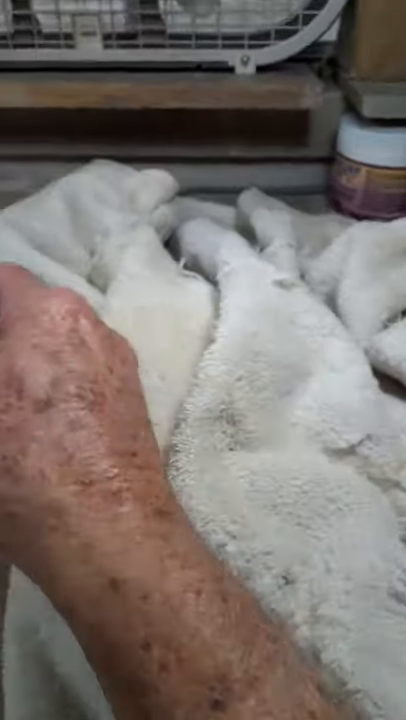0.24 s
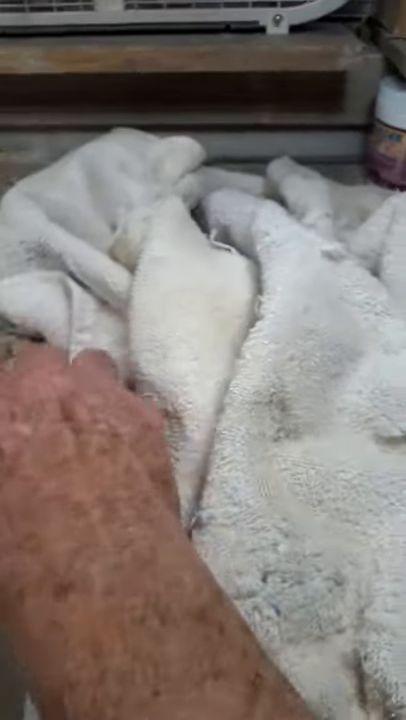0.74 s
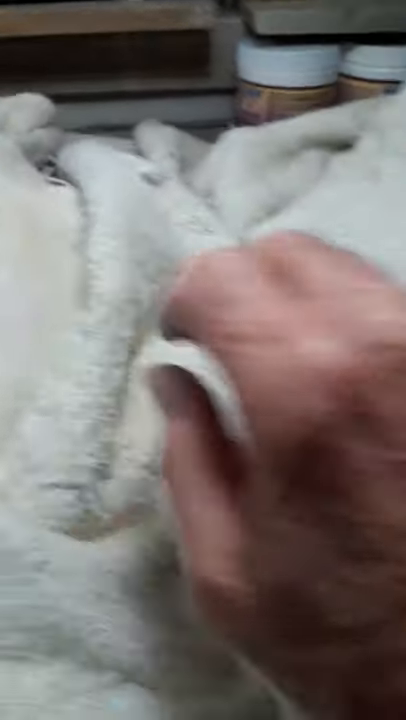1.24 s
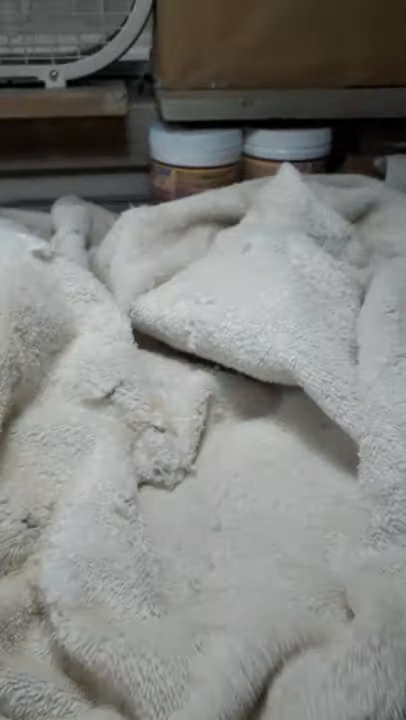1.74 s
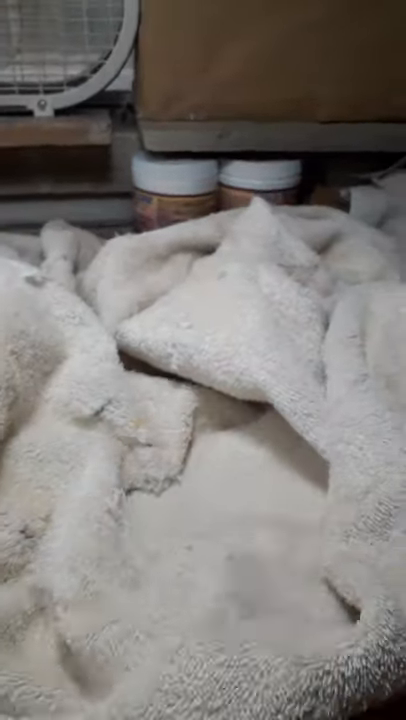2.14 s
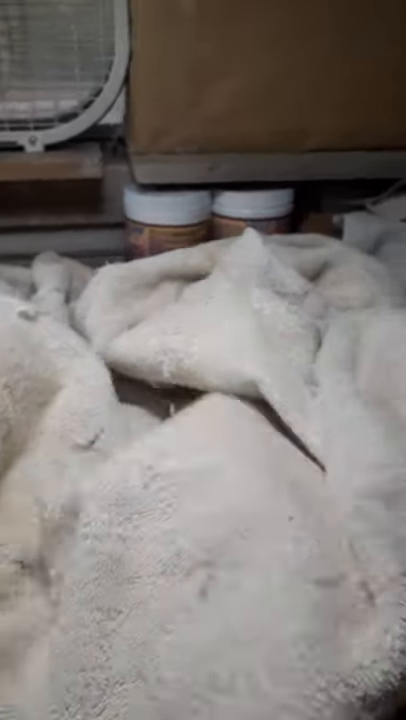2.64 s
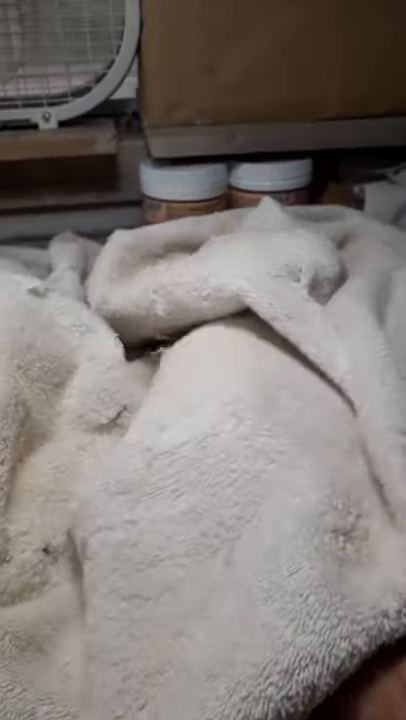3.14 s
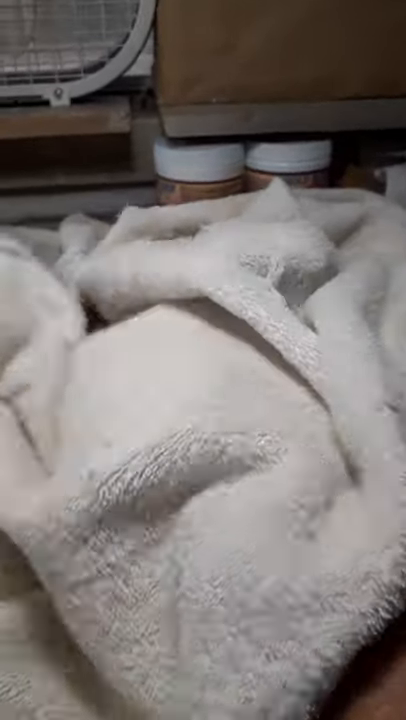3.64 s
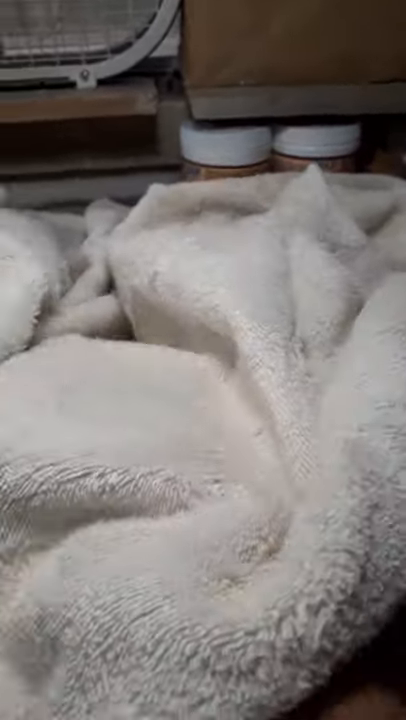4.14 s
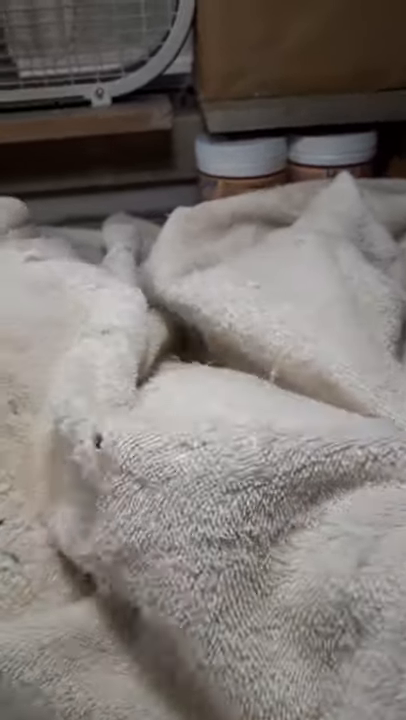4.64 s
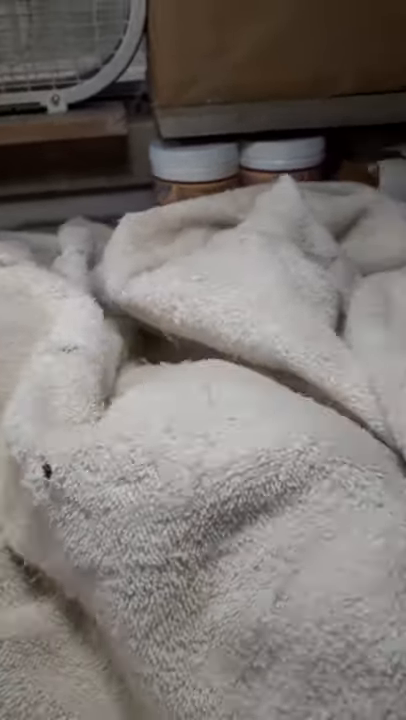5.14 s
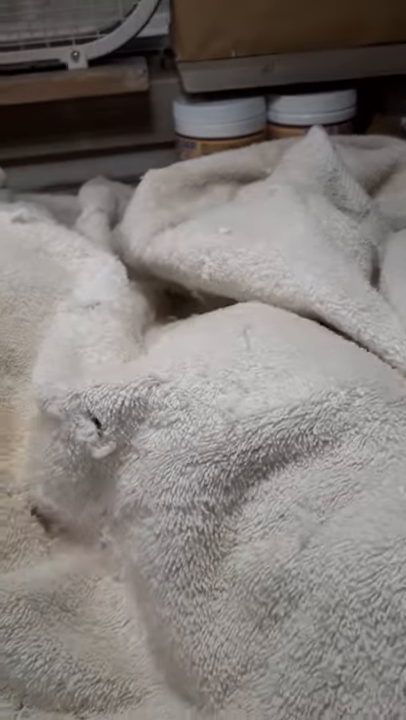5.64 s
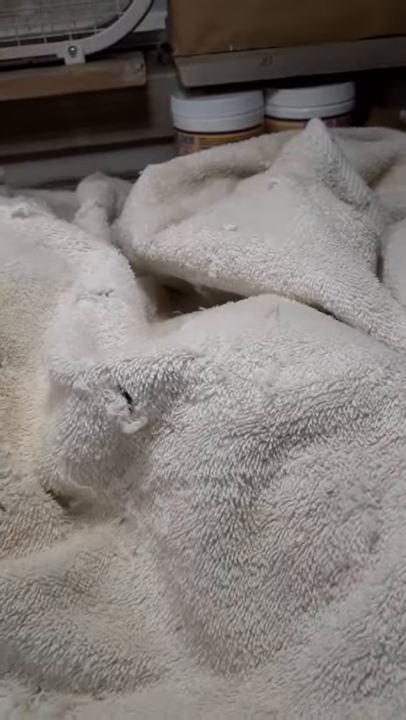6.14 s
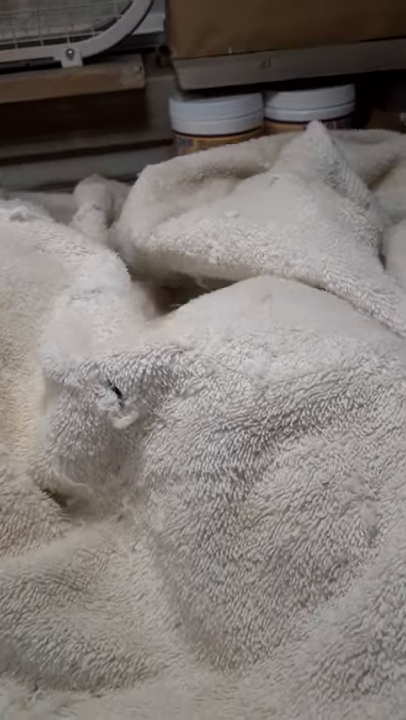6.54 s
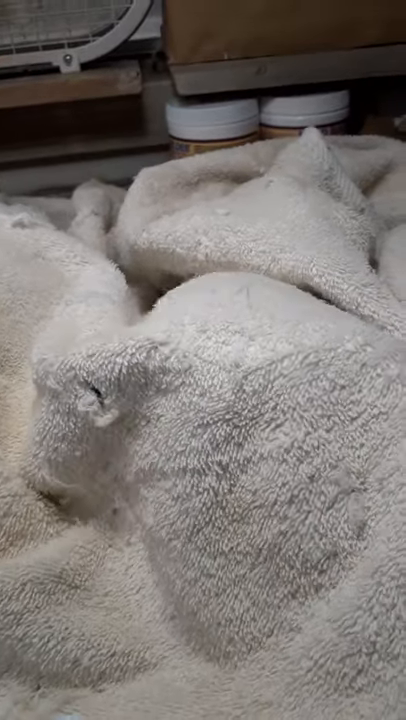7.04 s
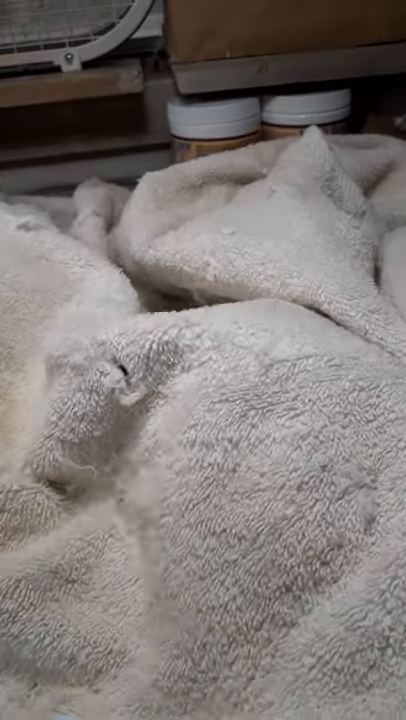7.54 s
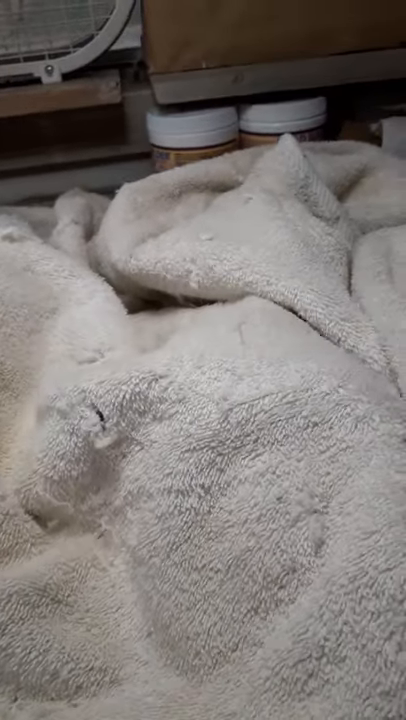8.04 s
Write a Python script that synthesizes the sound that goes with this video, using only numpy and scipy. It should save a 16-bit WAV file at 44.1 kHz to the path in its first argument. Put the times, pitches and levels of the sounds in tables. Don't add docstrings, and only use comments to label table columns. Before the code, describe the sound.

Close, dry stone clicks and gritty rubs, soft table thumps and cloth rustle, with the loudest knock muffled under a towel midway.

```python
import sys
import numpy as np
from scipy import signal
from scipy.fft import rfft, irfft
from scipy.io import wavfile

SR = 44100
rng = np.random.default_rng(int(sys.argv[2]) if len(sys.argv) > 2 else 0)


def persist_wave(psi):
    counts = np.round(np.clip(psi, -1, 1) * 32767).astype(np.int16)
    wavfile.write(sys.argv[1], SR, np.atleast_2d(counts).T)


def volts_from_decibels(level):
    exponent = np.asarray(level, float) / 20
    return 10 ** exponent


N = 366030

PORT_LAG_S_PER_DB = .00002
SIDES = np.array([[1], [-1]])


def rms_one(x):
    return x / np.sqrt(np.mean(x ** 2) + 1e-20)


def in_time(rows):
    return np.interp(np.arange(N) / SR, *np.transpose(rows))


def drift(rate_hz):
    knots = rng.standard_normal(4000)
    return np.interp(np.arange(N) / SR * rate_hz, np.arange(4000), knots) * np.sqrt(1.5)


def colour(x, spectrum):
    size = 2048
    hz, db = np.transpose(spectrum)
    bins_hz = np.arange(1, size // 2 + 2) * SR / size
    log_gain = np.log(volts_from_decibels(np.interp(np.log(bins_hz), np.log(hz), db)))
    cepstrum = irfft(log_gain)
    cepstrum[1:size // 2] *= 2
    cepstrum[size // 2 + 1:] = 0
    impulse = irfft(np.exp(rfft(cepstrum)))
    return signal.oaconvolve(x, np.atleast_2d(impulse), axes=-1)[:, :N]


def ring(hz, t60_s):
    t = np.arange(int(t60_s * SR) + 8) / SR
    return np.sin(2 * np.pi * hz * t) * volts_from_decibels(-60 * t / t60_s)


def resonate(x, hz, width_hz):
    r = np.exp(-np.pi * width_hz / SR)
    poles = [1, -2 * r * np.cos(2 * np.pi * hz / SR), r * r]
    return np.sqrt((1 - r * r) / 2) * signal.lfilter([1, 0, -1], poles, x)


def muffle(x, cut_hz):
    return signal.sosfilt(signal.butter(2, min(cut_hz, 16000), fs=SR, output="sos"), x)


def grains(per_s, spread_db):
    sizes = volts_from_decibels(spread_db * np.minimum(rng.exponential(1, N), 4))
    sizes = sizes * rng.choice([-1, 1], N)
    return rms_one(sizes * (rng.random(N) < per_s / SR))


def add(out, at_s, sound, pan_db):
    for side, sign in enumerate([1, -1]):
        start = int((at_s - sign * pan_db * PORT_LAG_S_PER_DB / 2) * SR)
        part = out[side, max(start, 0):][:len(sound)]
        part += volts_from_decibels(sign * pan_db / 2) * sound[:len(part)]


def pair(x, pan_db, alike):
    time, alike = np.arange(N), np.clip(alike, 0, 1)
    lag = pan_db * PORT_LAG_S_PER_DB * SR / 2
    left = np.interp(time + lag, time, x[0])
    right = np.interp(time - lag, time, x[0])
    return np.sqrt(alike) * np.array([left, right]) + np.sqrt(1 - alike) * x[1:]


def joined(*levels_db):
    return 10 * np.log10(sum(volts_from_decibels(db) ** 2 for db in levels_db))


def efforts(s, hold_s, db, rise_db_s, release):
    fall_db_s, tail_db, tail_db_s = release
    t = np.arange(0, N + 64, 64)[:, None] / SR
    after = np.maximum(t - s - np.abs(hold_s), 0)
    rise = volts_from_decibels(db - rise_db_s * np.maximum(s - t, 0))
    fall = np.maximum(volts_from_decibels(-fall_db_s * after), volts_from_decibels(tail_db - tail_db_s * after))
    level_db = 10 * np.log10(np.sum((rise * fall) ** 2, axis=1) + 1e-14)
    return np.interp(np.arange(N) / SR, t[:, 0], level_db)


# start_s [s], level_db [peak dB], pitch_hz [Hz], pan_db [left-right dB]
OPEN_CLACKS = [(0.5826, -18, 4500, 3), (0.6152, -17, 4700, -1), (0.6401, -12.5, 4700, 5),
               (0.652, -27.5, 4200.0, -8), (0.6591, -23, 2350, 13.5), (0.9982, -27, 4750, 6.5),
               (1.048, -34, 2820, 10), (1.1135, -26, 2820, 2.5), (1.1326, -35, 2765, 15),
               (1.578, -59, 1790, -5), (2.145, -36, 4350, -8.5), (2.845, -44.5, 4600, -8.5),
               (3.6143, -20, 2400, -2), (3.6264, -25.5, 2310, 4.5), (3.6344, -26.5, 2330.0, -3.5),
               (3.6991, -35, 1680, 6), (3.753, -40.5, 2520, 8), (3.9012, -36.5, 1260, -13),
               (3.9865, -20.5, 2480, 4), (4.2474, -29.5, 2130, -6.5), (4.29, -26.5, 2100, -6),
               (4.3464, -21.5, 1900, 4.5), (4.357, -28.5, 1490, -1), (4.399, -28, 1430, -4),
               (4.434, -31, 1300, -9)]
# start_s [s], level_db [peak dB], pitch_hz [Hz], pan_db [dB]
DEEP_CLACKS = [(4.6594, -37, 1870, -16), (4.7297, -32, 2050, -27.5), (4.741, -21.5, 2160, -3.5),
               (4.77, -21, 4200, -2.5), (4.7764, -9.5, 2160, -12.5), (4.7808, -17.5, 2240, -7.5),
               (4.788, -23, 2330, -11), (4.798, -23, 2320, -10), (4.8576, -20.5, 2070, -4.5),
               (5.011, -22, 2300, -12), (5.1207, -29.5, 1260, -5), (5.185, -38.5, 1470, -7),
               (5.7582, -36.5, 2180, -17), (5.815, -31.5, 2640, -6), (5.8525, -31.5, 3800, -1.5),
               (6.1432, -16, 3300, 5), (6.208, -26, 2570, -5), (6.984, -24, 2540, -11),
               (7.1405, -30, 2570, -5), (7.1595, -40.5, 2720, 18), (7.1772, -36.5, 2100, -3),
               (7.2959, -36.5, 2010, -0.5), (7.431, -35.5, 2780, 0), (7.5202, -37.5, 2060, -7),
               (7.559, -36, 2100, -6.5), (7.6031, -17.5, 2840, -2), (7.6565, -22, 2760, -5),
               (7.7773, -30.5, 2040, -6.5), (7.869, -23, 2450, -11), (7.912, -27, 2840, -4)]


def clacks(out):
    events = OPEN_CLACKS + DEEP_CLACKS
    chance = rng.standard_normal((len(events), 600))
    for (start_s, level_db, pitch_hz, pan_db), noise in zip(events, chance):
        knock = ring(pitch_hz, 2.6 / pitch_hz + 0.00092)
        overtone = ring(pitch_hz * (1.8 + .1 * noise[1]), .002) * volts_from_decibels(2 * noise[0])
        knock[:len(overtone)] += volts_from_decibels(-19) * overtone[:len(knock)]
        cycles = np.arange(len(knock)) * pitch_hz / SR
        knock *= 1 - np.exp(-(cycles / 0.16) ** 2)
        chatter = noise ** 3 * volts_from_decibels(-33 - 60 * np.arange(600) / SR / 0.025)
        chatter[0] = 1
        sound = muffle(np.convolve(chatter, knock), 2.4 * pitch_hz)
        add(out, start_s - .0002, -volts_from_decibels(level_db + 6.5) * sound, pan_db)


# start_s [s], level_db [peak dB],
# pitch_hz [Hz], pan_db [left-right dB]
LIGHT_TOUCHES = [(0.599, -30, 2120, 2), (0.6764, -34, 1670, 3), (.7585, -31, 1900, 3),
                 (.7635, -32, 1600, 3), (.788, -34, 2200, 3), (1.1214, -33, 2600, 5),
                 (1.1434, -34, 2600, -1), (4.068, -36, 3600, 1), (4.209, -38, 2020, -2),
                 (4.584, -49.5, 5300, -3.5), (4.8132, -22.5, 2080, -3), (5.682, -61, 3000, -11),
                 (5.8357, -40.5, 3200, -6.5), (5.8521, -34.5, 2520, 1), (6.0526, -43.5, 1460, -2),
                 (6.0944, -42, 9000, 0), (6.1174, -37, 2000, -1.5), (6.1978, -32, 2200, -2),
                 (6.969, -52.5, 2980, -5.5), (4.4265, -37, 1500, -3), (7.0745, -41, 2300, -1),
                 (6.58, -42, 2600, -3), (4.3265, -36, 1700, 0), (7.1898, -32, 1640, 0),
                 (7.1974, -43, 2100, -3), (4.6295, -45, 1800, -7), (7.2274, -56, 4400, -3),
                 (7.2364, -51, 1900, 0), (4.2605, -36, 2500, -5), (7.314, -47, 3900, -3),
                 (7.3318, -46, 8500, 1), (7.5435, -43, 9000, 0), (7.5655, -38, 9000, -4),
                 (7.5788, -36, 8000, -4), (7.6658, -24, 2760, -12), (7.6764, -31, 4300, -12),
                 (7.71, -31, 2310, -6.5), (7.718, -36, 2350, -5), (7.7478, -27, 2300, -6),
                 (7.783, -31, 2080, -6), (7.8814, -35, 2450, -7.5), (7.9483, -29, 2430, 1),
                 (7.9607, -33, 4500, -4), (6.628, -48, 2500, -3), (5.29, -56, 4500, -5.5)]


def ticks(out):
    for start_s, level_db, pitch_hz, pan_db in LIGHT_TOUCHES:
        knock = ring(pitch_hz, 3.3 / pitch_hz + 0.00056)
        cycles = np.arange(len(knock)) * pitch_hz / SR
        knock *= 1 - np.exp(-(cycles / 0.24) ** 2)
        add(out, start_s, -volts_from_decibels(level_db + 3.5) * muffle(knock, 3.9 * pitch_hz), pan_db)


# [favoured by the spot struck, Hz]
FREE_SLAB_HITS = [(0.5815, -24, 12000), (0.615, -25.5, 12300), (0.64, -26, 11580), (0.661, -42, 8990),
                  (0.759, -41, 11800), (0.0, -56, 11900), (0.84, -61, 12000), (0.88, -61, 11600),
                  (0.92, -60, 11700), (0.957, -62, 11500), (1.078, -47, 11600), (1.14, -52, 11500),
                  (0.997, -48, 11700), (1.048, -44, 11550), (1.112, -45, 11640)]
# [time to fall 60 dB, s]
FREE_SLAB_MODES = [(8990, 0.24), (11430, 0.16), (12150, 0.087), (12300, 0.13), (13480, 0.06)]
# [favoured, Hz]
DAMPED_SLAB_HITS = [(3.6144, -35.5, 11730), (3.9855, -19.5, 10790), (4.056, -37.5, 10890),
                    (4.2477, -26, 13100), (4.2905, -36, 14100), (4.3377, -40, 10870), (4.776, -30.5, 12050),
                    (5.005, -46, 11730), (5.757, -55, 11450), (5.8524, -73.5, 11300), (6.0745, -52, 11700),
                    (6.12, -46, 11800), (6.141, -28.5, 11490), (6.9828, -33.5, 11920),
                    (7.1413, -40.5, 11860), (7.295, -50, 11700), (7.5213, -56, 11500), (7.6014, -29, 11870),
                    (7.6565, -37, 11500), (7.716, -52, 12100), (7.7485, -42, 11070), (7.779, -44, 11070)]
# [time to fall 60 dB, s]
DAMPED_SLAB_MODES = [(11070, 0.054), (11440, 0.061), (12160, 0.058), (14120, .06), (15400, .04)]


def slab(out, hits, modes, split_hz, pan_db, rise_s):
    shade_db_per_octave, deepest_shade_db = 164.5, -32.5
    contact_loss_db = -6
    hits = sorted(hits)
    next_hits = hits[1:] + [(N / SR,)]
    for (start_s, level_db, favoured_hz), (next_s, *_) in zip(hits, next_hits):
        for pitch_hz, t60_s in modes:
            octaves_off = abs(np.log2(pitch_hz / favoured_hz))
            mode_db = max(-shade_db_per_octave * octaves_off, deepest_shade_db)
            beating = .3 * ring(pitch_hz + split_hz, 1.6 * t60_s)
            strong = ring(pitch_hz, t60_s)
            beating[:len(strong)] += strong
            t = np.arange(len(beating)) / SR
            beating *= 1 - np.exp(-t / rise_s)
            beating *= volts_from_decibels(contact_loss_db * np.clip((t + start_s - next_s) / .003 + 1, 0, 1))
            add(out, start_s, volts_from_decibels(level_db + mode_db + 5.5) * beating, pan_db)


# start_s [s], length_s [s], level_db
# [dB], pitch_hz [Hz], width_hz [Hz]
SINGING_SCRAPES = [(0.738, 0.066, -43.5, 1640, 700), (2.844, 0.1, -52, 260, 117),
                   (3.68, 0.021, -53, 1840, 700), (3.899, 0.037, -57.5, 1160, 690),
                   (3.999, 0.16, -49, 433, 294), (4.786, 0.03, -29.5, 2180, 790),
                   (4.987, 0.047, -34.5, 2330, 696), (4.986, 0.051, -38.5, 1240, 400),
                   (5.025, 0.1, -57, 2700, 200), (5.11, 0.019, -48.5, 1380, 786),
                   (5.179, 0.021, -53, 1360, 795), (5.715, 0.024, -58.5, 2200, 900),
                   (5.851, 0.029, -45, 855, 495), (6.054, 0.042, -48.5, 1440, 790),
                   (6.115, 0.022, -47.5, 1880, 700), (6.139, .045, -38, 2670, 600),
                   (6.139, 0.028, -35.5, 3700, 905), (6.204, 0.026, -44.5, 1080, 600),
                   (6.948, 0.13, -64, 1300, 725), (7.137, 0.042, -60, 3780, 595),
                   (4.364, .012, -48, 11000, 6000), (7.43, 0.015, -55, 1500, 1200),
                   (7.519, 0.03, -53, 1670, 300), (7.587, 0.028, -40, 1260, 400),
                   (7.615, 0.048, -41, 990, 300), (7.66, 0.035, -42, 586, 400),
                   (7.666, 0.087, -49, 2220, 900), (3.987, .03, -47, 3600, 3000),
                   (7.936, 0.04, -46.5, 2520, 700), (.86, 0.14, -62, 890, 600),
                   (6.52, 0.11, -64.5, 2500, 1500), (5.8, .04, -47, 990, 400),
                   (6.981, 0.01, -38.5, 2480, 400), (0.611, .012, -38, 7860, 1200),
                   (7.001, 0.063, -63, 3900, 1200), (5.753, 0.02, -47, 695, 500),
                   (1.001, .025, -48, 4600, 1200)]


def scrapes(pan_db):
    size = SR // 3
    out = np.zeros((2, N))
    chance = rng.standard_normal((len(SINGING_SCRAPES), 3, size))
    for (start_s, length_s, level_db, pitch_hz, width_hz), noise in zip(SINGING_SCRAPES, chance):
        phase = np.arange(size) / SR / length_s
        stroke = np.sin(np.pi * np.minimum(phase, 1) ** 0.82)
        tail = volts_from_decibels(-18.5 - 6.4 * phase) * np.minimum(3 * phase, 1)
        push = np.maximum(stroke, tail)
        slips = (noise[0] + .35 * noise[1:]) * np.abs(noise[0]) ** 1.4
        singing = resonate(resonate(slips, pitch_hz, width_hz), pitch_hz, 2 * width_hz)
        sound = volts_from_decibels(level_db) * push * rms_one(muffle(singing, 1.4 * pitch_hz))
        start = int(start_s * SR)
        placed = volts_from_decibels(pan_db[start] / 2 * SIDES) * sound
        out[:, start:start + size] += placed[:, :N - start]
    return out


# start_s [s], hold_s [s], rub_db [dB], towel_db [dB]
HAND_JERKS = [
    (0.582, 0.016, -45.5, -48),
    (0.613, 0.02, -34, -48),
    (1.011, 0.149, -64, -65),
    (1.579, 0.008, -62.5, -64),
    (2.852, .005, -76, -56.5),
    (3.986, .11, -50, -60.5),
    (4.758, 0.057, -39, -61.5),
    (4.986, 0.036, -44, -59.5),
    (5.497, 0.016, -62, -95.5),
]


def sudden(column, under_db, release):
    rise_db_s = 5000
    start_s, level_db = np.transpose(OPEN_CLACKS + DEEP_CLACKS)[:2]
    jerks = np.transpose(HAND_JERKS)
    from_clacks = efforts(start_s, 0.00059, level_db + under_db, rise_db_s, release)
    from_jerks = efforts(*jerks[:2], jerks[column], rise_db_s, release)
    return joined(from_clacks, from_jerks)


# start_s [s], hold_s [s], level_db [dB]
FACE_RUBS = [(0.0, 0.0042, -49.5), (0.763, 0.014, -42), (0.915, 0.073, -65), (1.04, 0.065, -56.5),
             (1.725, .02, -71), (1.951, 0.0039, -39), (2.106, 0.16, -64.5), (2.57, 0.0058, -57),
             (2.877, 0.47, -74.5), (3.442, 0.32, -74), (3.787, .005, -55.5), (4.25, 0.0056, -40.5),
             (4.304, 0.23, -49), (4.473, .25, -56.5), (5.21, 0.0053, -69), (5.3, 0.022, -67.5),
             (5.547, .03, -58.5), (5.726, 0.045, -54), (5.862, 0.0062, -48.5), (6.073, 0.0083, -53),
             (6.135, 0.079, -46), (6.577, 0.0046, -50.5), (6.68, 0.05, -68), (7.207, 0.087, -64.5),
             (7.601, 0.03, -39), (7.748, .05, -48), (7.947, 0.0037, -39.5), (8.172, 0.0038, -55)]
# pitch_hz [Hz], width_hz [Hz], level_db [dB]
STONE_MODES = [(905, 560, -0.5), (1425, 130, -1.5), (1610, 340, -5.5), (2450, 270, -0.5), (2707, 350, -4.5),
               (3830, 300, -3.5), (4600, 680, -4.5), (8600, 880, -26.5)]
# time_s [s], change_db [dB]
TOWEL_COVER = [
    (0.0, 1),
    (4.3, -2),
    (4.8, -7.5),
    (6.0, -5.5),
    (6.3, -2.5),
    (8.3, -3.5),
]


def grinding(pan_db):
    release = (880, -16.5, 120)
    rubbing_db = efforts(*np.transpose(FACE_RUBS), 447, release)
    level_db = joined(rubbing_db, sudden(2, -20, release))
    per_s = 1200 * volts_from_decibels(6 * drift(110))
    clicks = np.array([grains(per_s, 4) for k in range(3)])
    favour = np.array([volts_from_decibels(1.8 * drift(14)) for stone in STONE_MODES])
    favour /= np.sqrt(np.mean(favour ** 2, axis=0))
    cover_db = in_time(TOWEL_COVER)
    sound = 0
    for k, (pitch_hz, width_hz, mode_db) in enumerate(STONE_MODES):
        gain = volts_from_decibels(mode_db + (pitch_hz > 3000) * cover_db) * favour[k]
        sound = sound + (-1) ** k * gain * resonate(clicks, pitch_hz, width_hz)
    sound = rms_one(muffle(sound, 7000))
    for pitch_hz, t60_s in DAMPED_SLAB_MODES[:3]:
        sound = sound + volts_from_decibels(-25.5 + 2.8 * drift(13)) * resonate(clicks, pitch_hz, 0.96 / t60_s)
    return volts_from_decibels(level_db - 1.5) * pair(sound, pan_db, 0.72) * volts_from_decibels(pan_db / 2 * SIDES)


# start_s [s], level_db [peak dB], pitch_hz [Hz]
WEIGHT_THUMPS = [(0.0, -17.5, 347), (0.454, -41.5, 146), (0.578, -24, 149), (0.995, -23, 133),
                 (1.579, -25.5, 99), (2.043, -25.5, 100), (2.55, -39, 160), (2.841, -20, 120),
                 (3.304, -43, 115), (3.747, -19.5, 136), (3.773, -16, 338), (3.964, -26, 123),
                 (4.659, -31.5, 153), (4.763, -17.5, 113),
                 (4.049, -39, 151), (4.088, -20.5, 373), (4.421, -27.5, 156), (5.754, -31.5, 153),
              (5.812, -35, 280), (5.857, -32, 423), (6.093, -34, 164), (6.169, -29, 304), (6.194, -34, 277),
              (7.074, -43.5, 156), (7.123, -47, 151), (7.139, -39, 167), (7.2, -48, 151), (7.229, -48, 161),
              (7.265, -47, 151), (7.294, -40, 158), (7.674, -30, 283), (7.868, -20, 287), (7.915, -37, 151),
              (7.959, -28, 382)]


def thumps(out):
    for start_s, level_db, pitch_hz in WEIGHT_THUMPS:
        sound = ring(pitch_hz, 7.6 / pitch_hz)
        cycles = np.arange(len(sound)) / SR * pitch_hz
        sound *= 1 - np.exp(-(cycles / 0.4) ** 2)
        add(out, start_s, volts_from_decibels(level_db - 7) * sound, -.6)


# start_s [s], hold_s [s], drum_db [dB], boom_over_drum_db [dB]
TABLE_BUMPS = [(0.0, 0.067, -58, 4.5), (.455, 0.033, -71, 16.5), (.583, 0.07, -44, 5.5),
               (.64, 0.008, -36, -3), (.996, 0.09, -53.5, 7.5), (1.578, 0.024, -52.5, 1),
               (1.875, 0.022, -72, 12), (2.035, 0.03, -58.5, 8), (2.548, 0.036, -54.5, 8),
               (2.848, 0.024, -56, 7), (3.304, 0.033, -76.5, 6), (3.52, 0.15, -85, 15),
               (3.618, 0.091, -47.5, 0), (3.75, 0.026, -47, 4), (3.987, 0.0033, -32.5, -2.5),
               (4.215, 0.098, -45, -3), (4.66, 0.016, -47, 9.5), (4.772, .03, -32, -7),
               (4.99, 0.048, -45.5, -18.5), (5.496, 0.12, -65.5, -0.5), (5.683, 0.085, -54.5, 1),
               (6.05, 0.051, -53, 1), (6.945, 0.115, -54, -0.5), (7.429, 0.041, -55.5, 1.5),
               (7.519, 0.068, -49.5, 0), (7.869, 0.0076, -32, -7), (8.13, 0.074, -59.5, 8)]
# start_s [s], hold_s [s], drum_db [dB], boom_over_drum_db [dB]
TABLE_SHOVES = [(.72, 0.1, -54, 5.5), (.82, 0.15, -62, -1), (1.91, 0.093, -65, 0.5),
                (2.155, 0.17, -54.5, 0.5), (2.96, 0.081, -68, 9.5), (3.86, 0.072, -60, 7.5),
                (4.05, 0.065, -43, 1.5), (4.35, 0.16, -41.5, 0.5), (4.53, 0.079, -46.5, -2.5),
                (4.85, 0.013, -40, -1), (5.1, 0.12, -58, 4), (5.24, 0.11, -68.5, -6),
                (5.83, 0.063, -48, -4), (6.15, 0.065, -43.5, -0.5), (6.57, 0.05, -49, 2),
                (6.98, 0.13, -58.5, 0), (7.16, 0.17, -61, 11.5), (7.665, 0.033, -40, -6.5),
                (7.72, 0.072, -48.5, -11), (7.92, 0.039, -41, 2.5)]
# [tail fall, dB/s]
TABLE_FALL = (690, -5.5, 135)


def table_load(boom):
    parts = []
    for rows, rise_db_s in [(TABLE_BUMPS, 3500), (TABLE_SHOVES, 230.5)]:
        start_s, hold_s, drum_db, boom_over_drum_db = np.transpose(rows)
        level_db = drum_db + boom * boom_over_drum_db
        parts.append(efforts(start_s, hold_s, level_db, rise_db_s, TABLE_FALL))
    return joined(*parts)


# pitch_hz [Hz], width_hz [Hz], level_db [dB]
TABLE_MODES = [(99, 64, 1), (161, 26, 2), (209.7, 18, -5), (275.4, 22, 0.5), (312.1, 7.1, -2), (380, 35, 2),
               (481.3, 91, -1.5), (643.4, 50, -5), (780, 86, -11.5), (968, 27, -10.5)]


def table(pan_db):
    bumps = np.array([grains(500, 3.61), rng.standard_normal(N), rng.standard_normal(N)])
    bumps = bumps * volts_from_decibels(1.7 * drift(55))
    modes = []
    for k, (pitch_hz, width_hz, mode_db) in enumerate(TABLE_MODES):
        modes.append((-1) ** k * volts_from_decibels(mode_db) * resonate(bumps, pitch_hz, width_hz))
    boom = volts_from_decibels(table_load(boom=True) - 3) * pair(sum(modes[:2]), pan_db, 0.975)
    drum = volts_from_decibels(table_load(boom=False) - 4) * pair(sum(modes[2:]), pan_db, 0.8)
    return boom + drum * volts_from_decibels(0.056 * pan_db * SIDES)


# start_s [s], hold_s [s], level_db [dB]
TOWEL_STROKES = [(0.0, 0.0016, -60), (0.71, 0.086, -79.5), (1.189, 0.18, -76.5), (1.634, 0.13, -64.5),
                 (1.946, 0.0017, -42), (2.148, 0.2, -53), (2.377, 0.092, -62.5), (2.56, 0.019, -53),
                 (2.767, 0.029, -63.5), (2.912, 0.15, -61), (3.125, 0.05, -62), (3.238, 0.11, -75.5),
                 (3.47, 0.24, -73), (3.635, 0.074, -63.5), (3.772, 0.2, -67), (4.185, 0.13, -63),
                 (4.332, 0.16, -57), (4.491, 0.45, -62), (4.853, 0.042, -59.5), (5.207, 0.083, -77.5),
                 (5.851, .005, -74), (6.128, 0.0042, -63.5), (6.57, 0.042, -72), (6.658, 0.14, -75),
                 (6.962, 0.17, -72), (7.209, 0.63, -75), (7.628, 0.13, -63), (7.928, 0.047, -57.5),
                 (8.165, 0.0046, -63.5), (8.27, 0.048, -77)]
# pitch_hz [Hz], level_db [dB per Hz]
TOWEL_SPECTRUM = [(710, -37), (1200, -16), (3070, -11.5), (3640, -8.5), (7190, -8.5), (11600, -4),
                  (15100, -11.5), (15800, -7)]


def towel():
    release = (510, -12.5, 73)
    stroking_db = efforts(*np.transpose(TOWEL_STROKES), 264.5, release)
    level_db = joined(stroking_db, sudden(3, -40, release))
    fibres = rng.standard_normal((2, N)) + 0.2 * grains(500, 3.5)
    return volts_from_decibels(level_db + 6.0) * volts_from_decibels(drift(40)) * rms_one(colour(fibres, TOWEL_SPECTRUM))


def room(x):
    t60_s, band_hz = 0.29, [250, 4900]
    t = np.arange(SR // 3) / SR
    tail = rng.standard_normal((2, len(t))) * volts_from_decibels(-60 * t / t60_s)
    tail *= np.minimum(t / 0.0096, 1)
    tail = signal.sosfilt(signal.butter(1, band_hz, "band", fs=SR, output="sos"), tail)
    return signal.oaconvolve(x, tail / np.sqrt(np.sum(tail[0] ** 2)), axes=-1)[:, :N]


# pitch_hz [Hz], level_db [dB per Hz]
ROOM_SPECTRUM = [(18, -35), (30, -4.5), (86, 7), (394, -8), (801, -14), (5450, -22), (6550, -22.5),
                 (14000, -13.5), (16000, -19)]


def room_tone():
    hiss_db, whine_db, whine_hz = -79, -89.5, 14110
    hiss = volts_from_decibels(hiss_db + 6.0) * rms_one(colour(rng.standard_normal((2, N)), ROOM_SPECTRUM))
    whine = np.sin(2 * np.pi * whine_hz * np.arange(N) / SR)
    return hiss + volts_from_decibels(whine_db + 2.0 * drift(6)) * whine


# time_s [s], pan_db [left-right dB]
STONE_PLACE = [
    (0.0, -5.5),
    (1.2, -1),
    (1.66, -11),
    (4.51, -8),
    (5.02, -5.5),
    (5.96, -5.5),
    (8.3, -7),
]


def scene():
    pan_db = in_time(STONE_PLACE)
    hits, rings = np.zeros((2, N)), np.zeros((2, N))
    clacks(hits)
    ticks(hits)
    thumps(hits)
    slab(rings, FREE_SLAB_HITS, FREE_SLAB_MODES, split_hz=27, pan_db=3.0, rise_s=.002)
    slab(rings, DAMPED_SLAB_HITS, DAMPED_SLAB_MODES, split_hz=40, pan_db=5.0, rise_s=.0045)
    rings *= volts_from_decibels(3.5 * drift(70) - 1)
    near = hits + grinding(pan_db) + table(pan_db)
    echo = volts_from_decibels(-13.5) * room(near)
    return near + rings + scrapes(pan_db) + echo + towel() + room_tone()


def top_cut(x):
    return signal.sosfilt(signal.butter(12, 15850, fs=SR, output="sos"), x)


def record(dry):
    x = signal.sosfilt(signal.butter(2, 48, "high", fs=SR, output="sos"), dry)
    x = signal.sosfilt(signal.cheby2(14, 60, 16150, fs=SR, output="sos"), x)
    return top_cut(x)


dry = scene()
out = record(dry)
persist_wave(out)
```